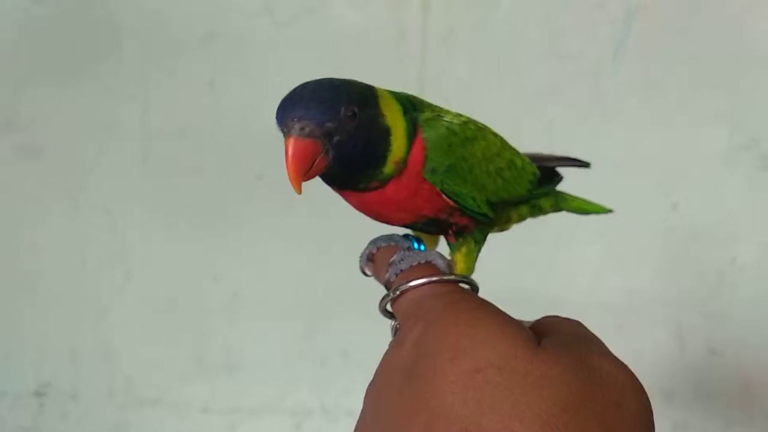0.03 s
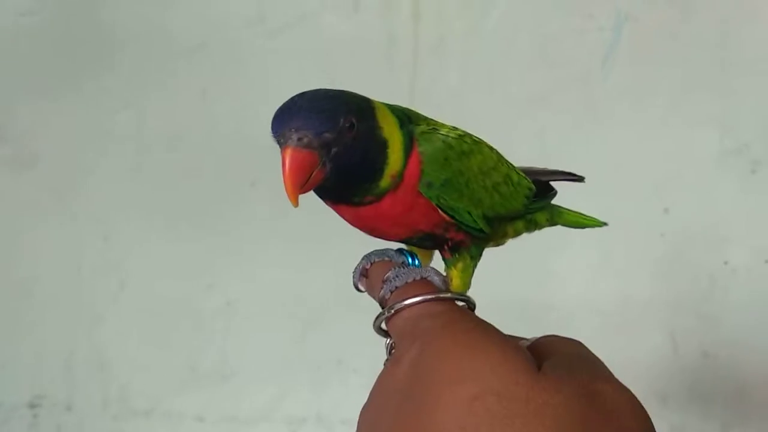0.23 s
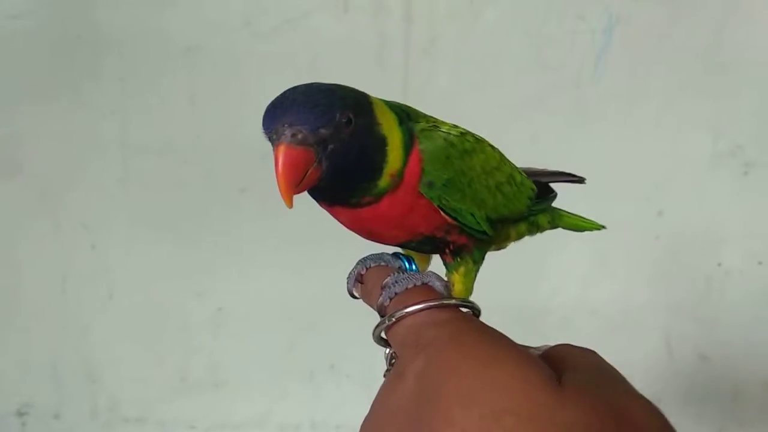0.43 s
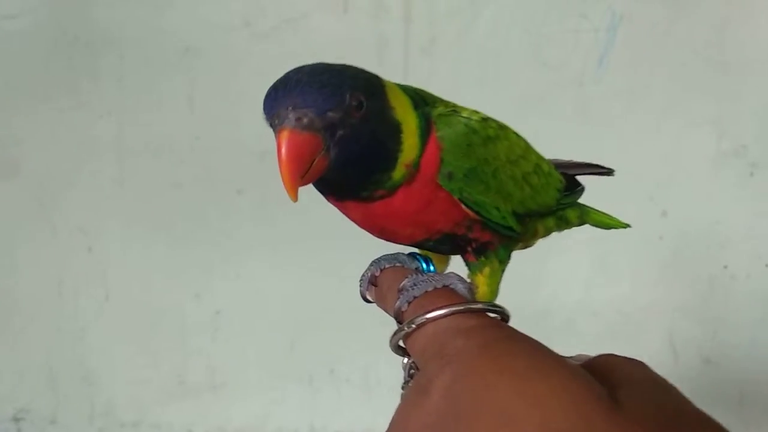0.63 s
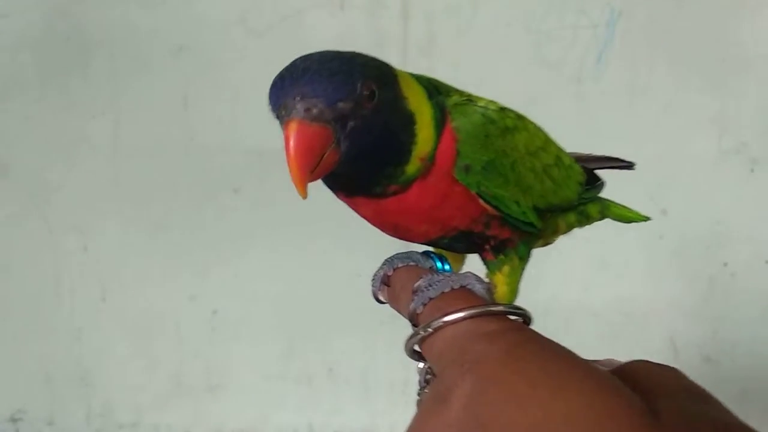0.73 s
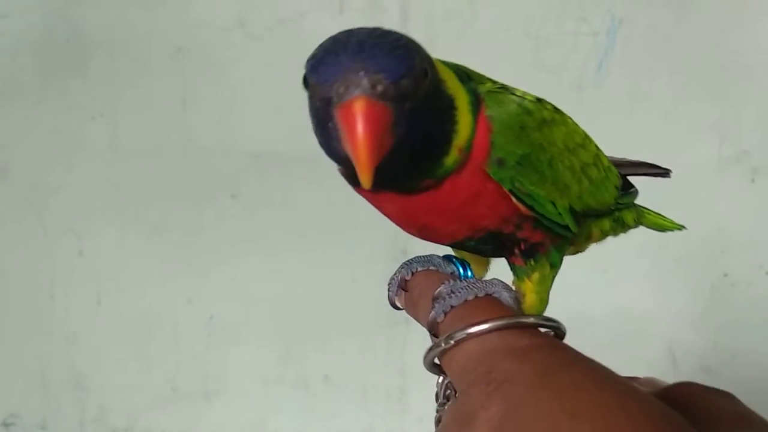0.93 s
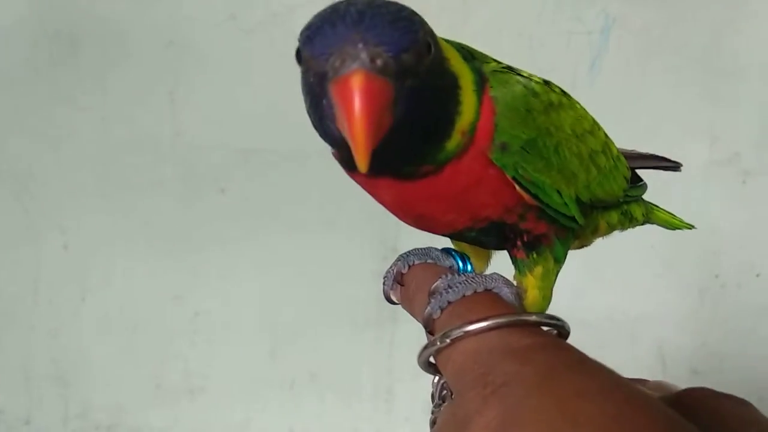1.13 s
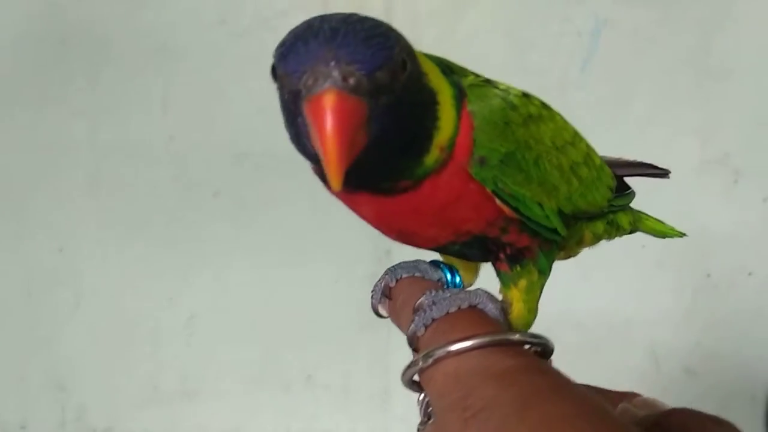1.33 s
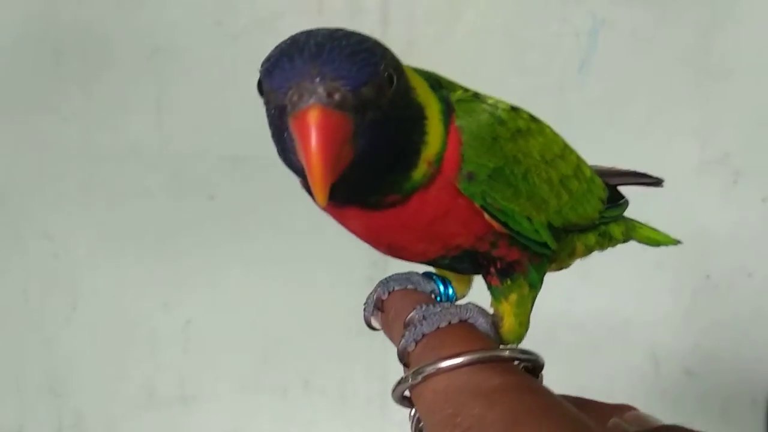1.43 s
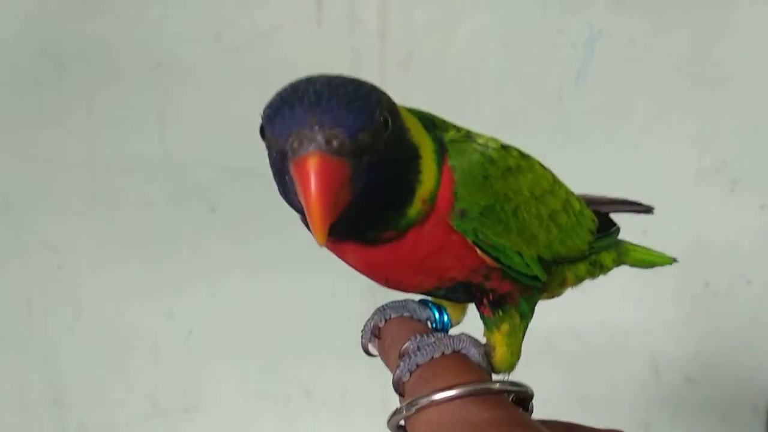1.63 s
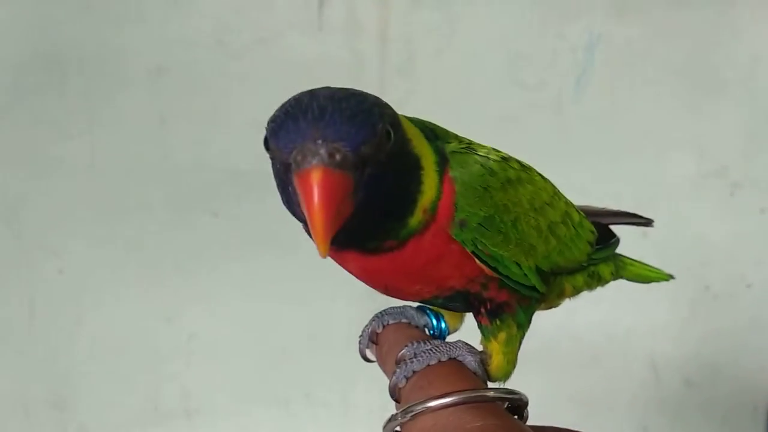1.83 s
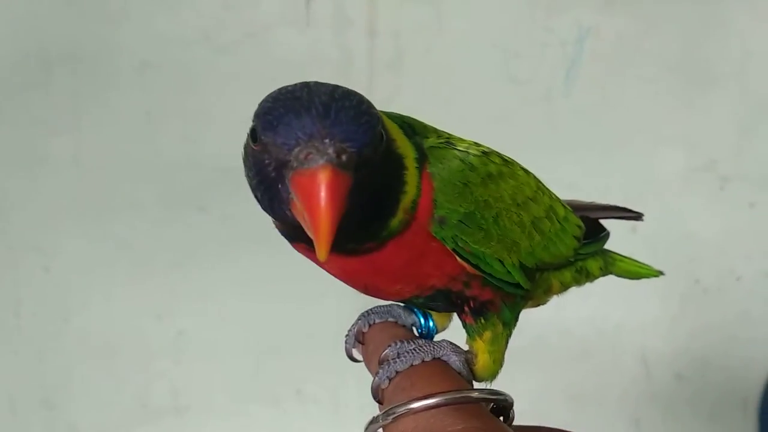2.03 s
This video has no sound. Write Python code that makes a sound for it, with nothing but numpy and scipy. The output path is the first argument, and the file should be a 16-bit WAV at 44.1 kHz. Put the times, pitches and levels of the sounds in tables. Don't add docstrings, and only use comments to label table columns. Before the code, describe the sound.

A small parrot chatters close to a phone in a bare, echoing room. Silence until 0.1 s, then fan hiss and low traffic rumble fade up, with small metal ticks and scrapes at 0.2-0.6 s. From about 0.6 s come short, high, scratchy squeaks, loudest around 1.0-1.2 s with a quick falling whistle, then more raspy notes from 1.4 to 2.05 s, over faint scrapes and low thrums.

```python
import sys
import numpy as np
from scipy import signal
from scipy.fft import rfft, irfft, next_fast_len
from scipy.io import wavfile
from scipy.ndimage import uniform_filter1d, map_coordinates

SR = 44100
rng = np.random.default_rng(int(sys.argv[2]) if len(sys.argv) > 2 else 0)


def voltage_ratio(level):
    return 10 ** (np.asarray(level, float) / 20)


def unload_audio(sound):
    columns = np.transpose(np.atleast_2d(sound))
    steps = np.round(np.clip(columns, -1, 1) * 32767)
    wavfile.write(sys.argv[1], SR, steps.astype(np.int16))


N = 91154


def unit(x):
    return x / np.sqrt(np.mean(x ** 2) + 1e-20)


def along(points, hz):
    point_hz, value = np.transpose(points)
    return np.interp(np.log(hz + 1), np.log(point_hz + 1), value)


def wobble(rate, size=N):
    knots = rng.standard_normal(int(size * 3000 / SR) + 4)
    return map_coordinates(knots, [np.arange(size) * min(rate, 3000) / SR])


def filtered(x, response):
    length = next_fast_len(x.shape[-1] + 8192)
    spectrum = rfft(x, length) * response(np.fft.rfftfreq(length, 1 / SR))
    return irfft(spectrum, length)[..., :x.shape[-1]]


def peak(centre_hz, width_hz):
    return lambda f: 1j * f * width_hz / (centre_hz ** 2 - f * f + 1j * f * width_hz)


def pair(response):
    # hz, likeness (0-1)
    likeness = [(60, 0.93), (180, 0.97), (550, 0.79), (1650, 0.016), (4970, 0.023), (15000, 0.05)]

    def split(hz):
        turn = np.arccos(np.clip(along(likeness, hz), -1, 1)) / 2
        return response(hz) * [np.cos(turn), np.sin(turn)]

    mid, side = filtered(rng.standard_normal((2, N)), split)
    return unit(np.array([mid + side, mid - side]))


def traffic_rumble():
    # hz, level_db (per Hz)
    rumble_tone = [(15, -81), (25, -74), (59, -8.5), (113, -1), (139, -1.5), (162, -20), (194, -10.5),
                   (234, -26.5), (300, -17.5), (390, -34), (660, -120)]
    # time_s, level_db
    swell = [(.1, -49), (.45, -49), (1.25, -50), (1.5, -51.5), (1.65, -44), (1.75, -53.5), (2.06, -50.5)]
    level_db = 4 + np.interp(np.arange(N) / SR, *np.transpose(swell)) + 1.5 * wobble(7.4)
    return voltage_ratio(level_db) * pair(lambda hz: voltage_ratio(along(rumble_tone, hz)))


def outside_thrums():
    # centre_s, length_s, pitch_hz, level_db
    thrum_table = [(.27, 0.062, 109, -40.5), (.46, 0.067, 138.4, -41.5), (0.632, 0.097, 112.5, -37.5),
                   (1.031, 0.029, 111, -30.5), (1.39, 0.068, 115, -34), (1.6, 0.089, 125, -35),
                   (1.916, 0.25, 74.1, -39), (.83, 0.031, 94, -38.5), (1.397, 0.075, 86, -36.5)]
    t = np.arange(N) / SR
    out = np.zeros(N)
    for centre_s, length_s, pitch_hz, level_db in thrum_table:
        swell = np.exp(-(2 * (t - centre_s) / length_s) ** 4)
        out += voltage_ratio(level_db) * swell * np.sin(2 * np.pi * pitch_hz * (t - centre_s))
    return 0.79 * out


def fan():
    # hz, level_db (per Hz)
    air_tone = [(90, -49), (150, -10), (250, -8), (400, -13.5), (1500, -17.5), (3000, -18), (9000, -21),
                (13000, -26), (15700, -28)]
    # centre_hz, width_hz, level_db
    hums = [(236.7, 13.5, -54), (761, 1.15, -60.5), (905.6, 4.1, -65)]
    t = np.arange(N) / SR
    swing_away_db = -0.5 * np.clip((t - 1.87) * 10, 0, 1)
    level_db = -46 + swing_away_db + wobble(8.0)
    out = voltage_ratio(level_db) * pair(lambda hz: voltage_ratio(along(air_tone, hz)))
    for centre_hz, width_hz, hum_db in hums:
        out += voltage_ratio(hum_db) * pair(lambda f: abs(peak(centre_hz, width_hz)(f)) ** 2)
    return out


def ring_and_chain():
    contact_s = [.189, .208, .273, .277, .276, .365, .42, .428, .454, .427, .472, .472, .483, .47, .582,
                 .711, .275, .425, .452, .31, 1.49, 1.58, 1.66, 1.74, 1.925]
    # level_db, centre_hz, width_hz, t60_s (time to fade by 60 dB)
    contacts = [(-36.5, 2200, 6000, .06), (-35, 7700, 9000, .033), (-33, 2600, 2300, .033),
                (-31, 1072, 190, .049), (-33, 520, 120, .064), (-40, 2700, 1200, .034),
                (-30.5, 9060, 2000, .024), (-40, 2600, 5300, .24), (-33, 2570, 160, .045),
                (-35.5, 4630, 2700, 0.04), (-28.5, 2900, 3080, .019), (-32.5, 8600, 3200, .037),
                (-34.5, 6000, 9000, .056), (-36.5, 940, 100, .071), (-37.5, 2800, 580, .02),
                (-33, 920, 110, .07), (-39, 900, 1250, 0.14), (-38, 500, 640, .1), (-39, 650, 760, 0.06),
                (-43, 2800, 790, 0.044), (-46, 1630, 1400, 0.38), (-47, 1100, 1300, 0.42),
                (-42, 1700, 1250, .3), (-40.5, 1550, 1000, .2), (-46, 1830, 600, 0.21)]
    out = np.zeros(N)
    t = np.arange(SR // 8) / SR
    for start_s, (level_db, centre_hz, width_hz, t60_s) in zip(contact_s, contacts):
        noise = rng.standard_normal(len(t))
        burst = unit(filtered(noise, lambda f: peak(centre_hz, width_hz)(f) ** 2))
        onset = np.clip(t / 0.00049, 0, 1)
        out[round(start_s * SR):][:len(t)] += voltage_ratio(level_db - 60 * t / t60_s) * onset * burst
    return out


def parrot():
    # start_s, length_s, level_db, roughness (0-1), breath_db
    notes = [(0.656, 0.049, -36.5, 0.12, -7), (0.677, 0.13, -36.5, 0.59, 4), (0.84, 0.035, -41.5, 0, 6.5),
             (0.881, 0.081, -36.5, 0.27, -2.5), (0.987, 0.026, -39.5, 0.08, -18),
             (1.014, 0.055, -29.5, 0.26, -15.5), (1.134, 0.0556, -34, 0.2, -2.5),
             (1.158, .138, -30, .17, -12), (1.419, 0.037, -33.5, 0.33, -7), (1.498, 0.019, -38.5, 0.03, -3),
             (1.522, 0.075, -33, 0.47, -5), (1.604, 0.071, -37.5, 0.58, -2.5),
             (1.658, 0.13, -38, 0.09, -0.5), (1.692, 0.081, -46.5, 0.08, -1),
             (1.805, 0.0873, -33.5, 0.07, -22), (2.048, 0.039, -39.5, 0.01, -4.5),
             (0.617, 0.045, -45.5, 0.93, -20), (1.682, 0.1, -45.5, 1.28, 6), (.962, 0.029, -41, 0.27, 1),
             (0.997, 0.0457, -32.5, 0.36, -16.5), (1.116, .06, -33.5, 0.33, -6.5),
             (1.429, .05, -40.5, 0.32, -11), (.73, 0.072, -45, 0.31, 5.5), (0.899, 0.061, -45.5, 0.52, -4),
             (1.91, .11, -42, .06, -12), (1.7, .09, -38, .1, -10)]
    # start_hz, end_hz
    pitches = [(2040, 2060), (2280, 2150), (2040, 2060), (2150, 2210), (1955, 1945), (2090, 2140),
               (2740, 2680), (5050, 2750), (2420, 2410), (2460, 2430), (1980, 2260), (2200, 2300),
               (2340, 2310), (2130, 2130), (2600, 2625), (2210, 2230), (1750, 2050), (2150, 2250),
               (2190, 2150), (2270, 2180), (2160, 2120), (2050, 2040), (2030, 2020), (3250, 3100),
               (2620, 2600), (2350, 2330)]
    # first_db, odd_db (other odd partials), bright_db (per octave), beak_hz, beak_db
    beaks = [(15.5, 3.5, 7.5, 8100, 2.5), (8.5, 11.5, -3, 9300, 13), (17, -1, 5.5, 13000, -15.5),
             (-17, -21, -12, 9500, 1), (-18, -13, -11, 11700, 26), (-34, 14, -11.5, 12800, 22.5),
             (-15, -17, 2, 14000, 15), (16, -4, -3, 13000, -4), (-29, -22, -5.5, 9700, 5),
             (-4, -22, 2, 9800, 0), (-24, -26, -15, 8330, 12.5), (-7.5, -25, -1, 11000, -2),
             (-16, -24, -5.5, 9300, 1), (-11, 6, -3, 7000, 20), (-7.5, -6, -1, 13000, 9.5),
             (7, -3, 0, 11100, 13.5), (21, -21, -16, 9100, -3), (21.5, 5, 3, 7900, 1),
             (-14, -15, -4.5, 9000, 5), (-31, -0.5, -9, 12600, 0), (-33, 0, -4, 12800, 9),
             (-20, -14, -1.5, 9900, 14), (4, 3, -5, 6000, 3), (14, 3, -13, 12000, 5),
             (-14, -10, -8, 7900, 0), (-20, -25, -8, 9300, 0)]
    # hz, level_db
    throat_tone = [(2100, -3.5), (4500, 3), (7000, -3), (9700, 0.5), (10600, -13), (11800, 0.5),
                   (13000, -5), (13800, -55)]
    attack_share, release_s = 0.22, 0.048
    beak_width, top_hz = 0.12, 13700

    out = np.zeros(N + SR)
    t = np.arange(SR // 4) / SR
    size = len(t)
    k = np.arange(1, 8)[:, None]

    def throat(hz):
        return voltage_ratio(along(throat_tone, hz))

    for (start_s, length_s, level_db, rough, breath_db), (from_hz, to_hz), beak in zip(notes, pitches, beaks):
        first_db, odd_db, bright_db, beak_hz, beak_db = beak

        glide = np.sin(np.pi / 2 * np.clip(t / length_s, 0, 1)) ** 2
        steady_hz = from_hz + (to_hz - from_hz) * glide
        wander = 0.008 * wobble(70, size=size) + 0.17 * rough * wobble(820, size=size)
        phase = 2 * np.pi * np.cumsum(steady_hz * (1 + wander)) / SR

        partial_hz = k * steady_hz
        near_beak = np.exp(-(np.log((partial_hz + 1) / beak_hz) / beak_width) ** 2)
        partial_db = np.where(k == 1, first_db, k % 2 * odd_db) + bright_db * np.log2(k)
        weight = voltage_ratio(partial_db + beak_db * near_beak) * throat(partial_hz) * (partial_hz < SR / 3)
        tone = unit((weight * np.sin(k * phase)).sum(0))
        breath = unit(filtered(rng.standard_normal(size) * (1 + np.cos(phase)) ** 2, throat))

        attack = np.sin(np.pi / 2 * np.clip(t / (attack_share * length_s), 0, 1)) ** 2
        release = np.exp(-np.clip(t - length_s, 0, None) / release_s * 2)
        flutter = voltage_ratio(0.5 * wobble(250, size=size) - 105 * t)

        def voice_range(f):
            low_edge = 1 / (1 + (0.85 * min(from_hz, to_hz) / (f + 1)) ** 28)
            return low_edge / (1 + (f / top_hz) ** 60)

        note = attack * release * flutter * (tone + voltage_ratio(breath_db) * breath)
        out[round(start_s * SR):][:size] += voltage_ratio(level_db) * filtered(note, voice_range)
    return out[:N]


def room(x):
    # hz, t60_s
    echo_time = [(300, 0.52), (2500, 0.32), (6000, 0.54), (13000, 0.33)]
    hz, t, z = signal.stft(rng.standard_normal((2, SR)), SR, nperseg=256)
    fade = voltage_ratio(-60 * t / along(echo_time, hz)[:, None])
    tail = signal.istft(z * fade, SR, nperseg=256)[1]
    tail = tail / np.linalg.norm(tail[0])
    delayed = np.pad(x, (130, 0))[None]
    return signal.fftconvolve(delayed, tail, axes=1)[:, :N]


def scene():
    background = traffic_rumble() + outside_thrums() + fan()
    metal = ring_and_chain()
    bird = parrot()
    near = voltage_ratio(-1.5) * bird + metal
    direct = np.array([np.roll(near, 12), 0.7 * near])
    echoes = room(voltage_ratio(1) * bird + voltage_ratio(-5) * metal)
    return direct + echoes + background


def drop_hidden_bands(x):
    from_hz = 2400
    window = np.sin(np.pi * (np.arange(2048) + 0.5) / 2048)
    hz, _, z = signal.stft(x, SR, window=window, nperseg=2048)
    bands = z[:, :1024].reshape(2, 128, 8, -1)
    centre_hz = hz[4:1024:8, None]
    power = uniform_filter1d((abs(bands) ** 2).mean(2), size=3, axis=-1)
    level = 10 * np.log10(power + 1e-20)

    fall = 42 * np.log2(centre_hz)
    mask = np.maximum.accumulate(np.where(centre_hz > from_hz, level + fall, -200), axis=1) - fall
    mask = mask - 8 + 5 * np.log2(centre_hz / 7000)

    loudest = np.where(centre_hz > from_hz, level, -200).max(1, keepdims=True)
    mask = np.maximum(mask, np.maximum(loudest - 27, level - 9))
    chance = uniform_filter1d(rng.standard_normal(level.shape[1:]), size=4, axis=1)
    mask = mask + 3.5 * unit(uniform_filter1d(chance, size=2, axis=0))
    mask = np.where(centre_hz > from_hz, mask, -200)

    kept = (bands * (level > mask)[:, :, None]).reshape(2, 1024, -1)
    kept = np.pad(kept, ((0, 0), (0, 1), (0, 0)))
    return signal.istft(kept, SR, window=window, nperseg=2048)[1][:, :N]


def top_cut(x):
    return signal.sosfilt(signal.butter(12, 15690, fs=SR, output="sos"), x)


def record(dry):
    # hz, left_over_right_db
    port_lean = [(60, 2), (150, 1.0), (380, 0), (950, 1), (2380, 8), (5980, 6.5), (15000, -7.5)]
    # time_s, level_db
    opening = [(0.1, -28), (0.112, -9.5), (.18, -5), (.2, -2.5), (.28, 2)]

    def port_tone(hz):
        lean_db = along(port_lean, hz) * np.array([[0.5], [-0.5]])
        return voltage_ratio(lean_db) * (hz < 15700)

    thinned = drop_hidden_bands(filtered(dry, port_tone))
    time_s, level_db = np.transpose(opening)
    volume = voltage_ratio(np.interp(np.arange(N) / SR, time_s, level_db, left=-200))
    return top_cut(thinned * volume)


dry = scene()
out = record(dry)
unload_audio(out)
```